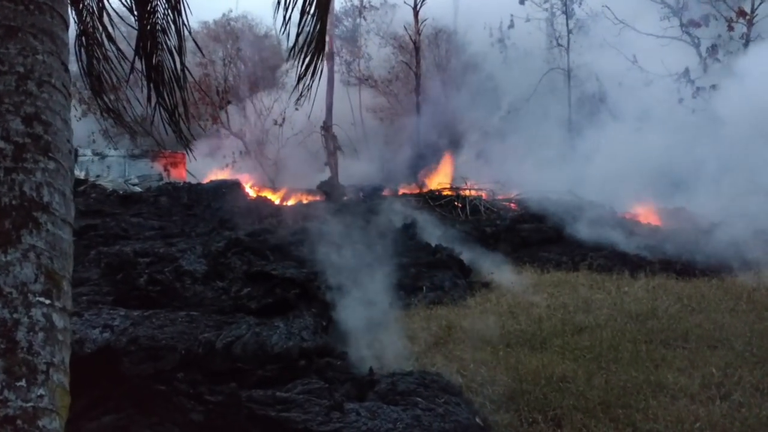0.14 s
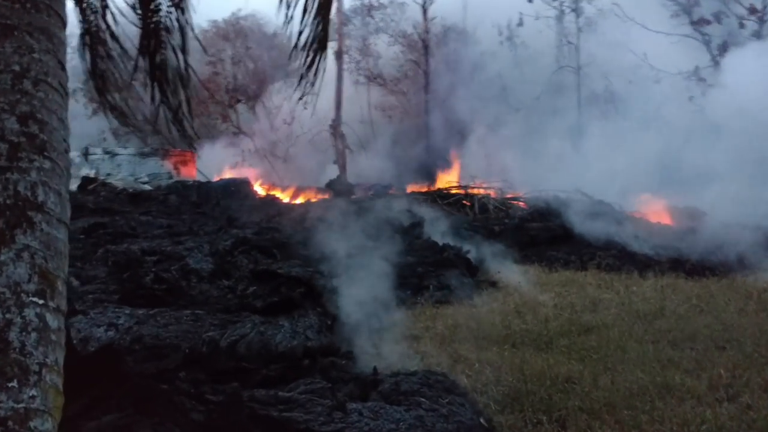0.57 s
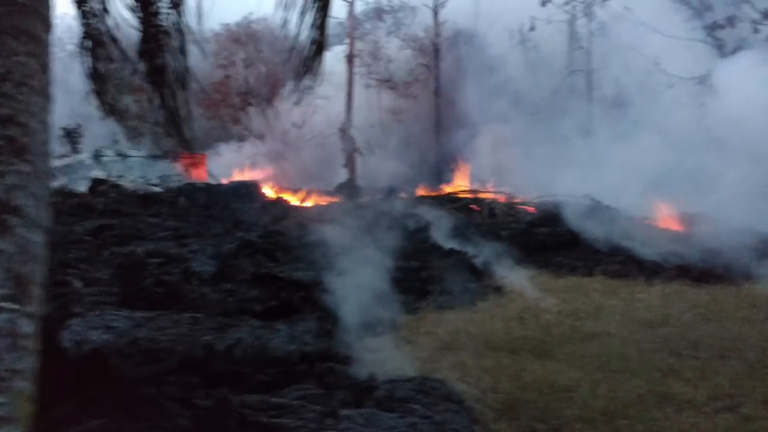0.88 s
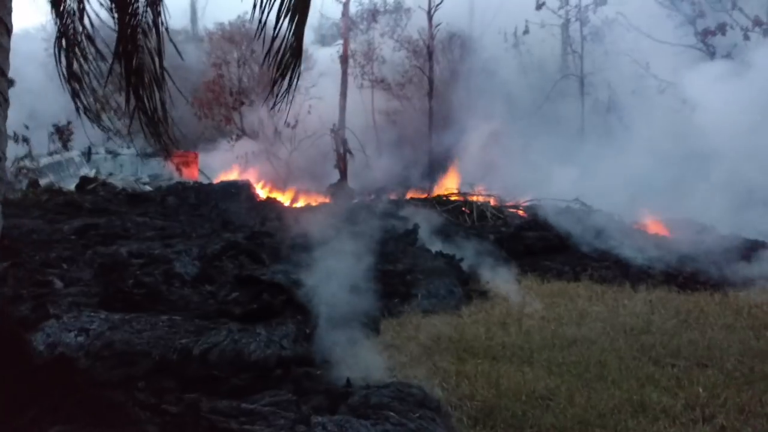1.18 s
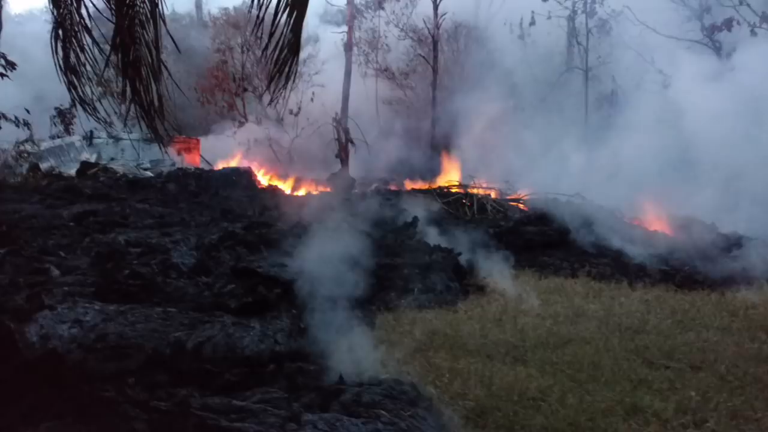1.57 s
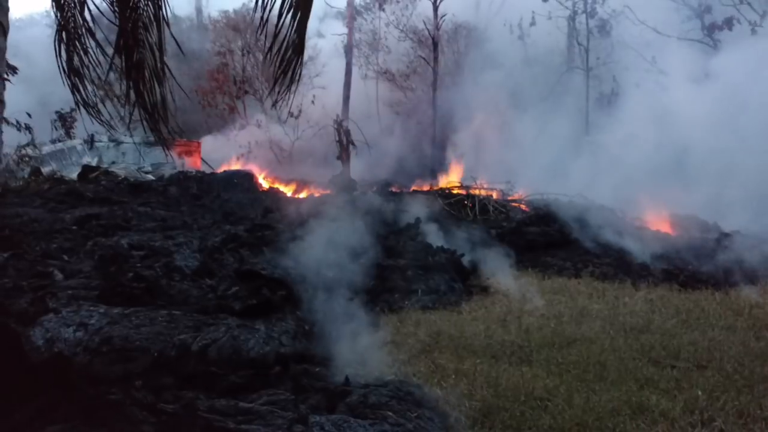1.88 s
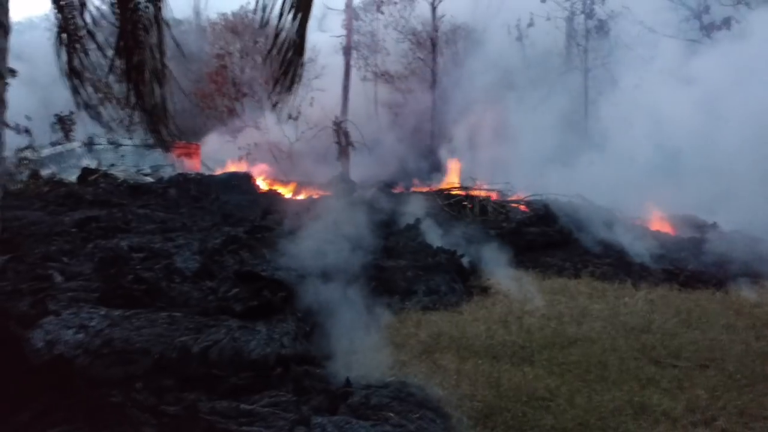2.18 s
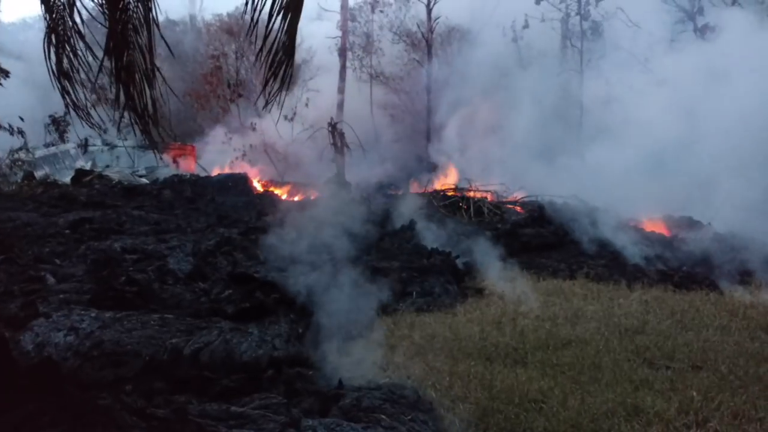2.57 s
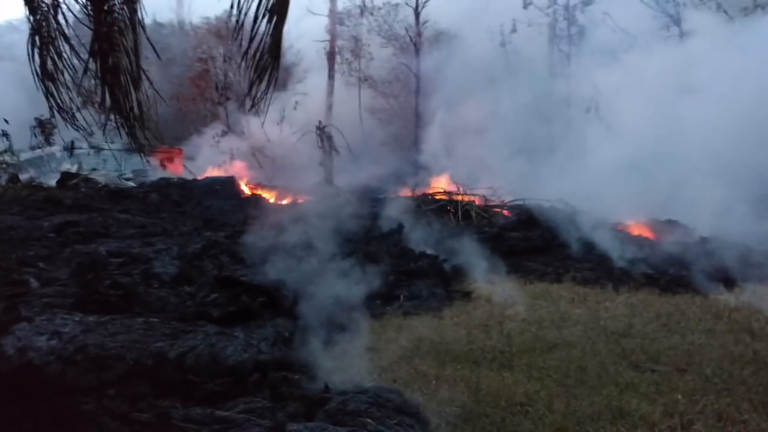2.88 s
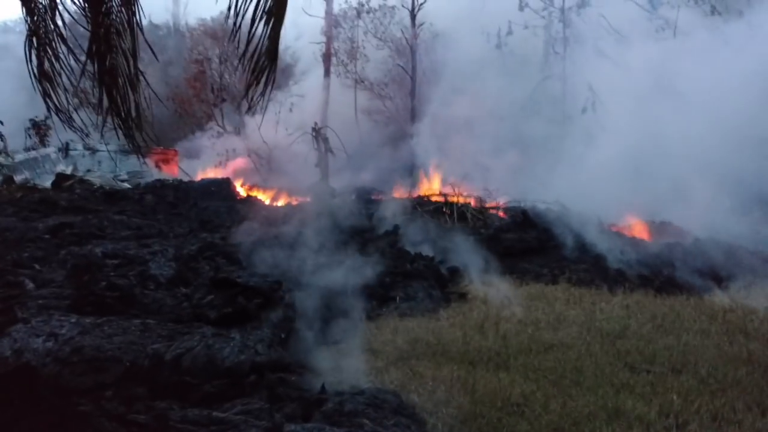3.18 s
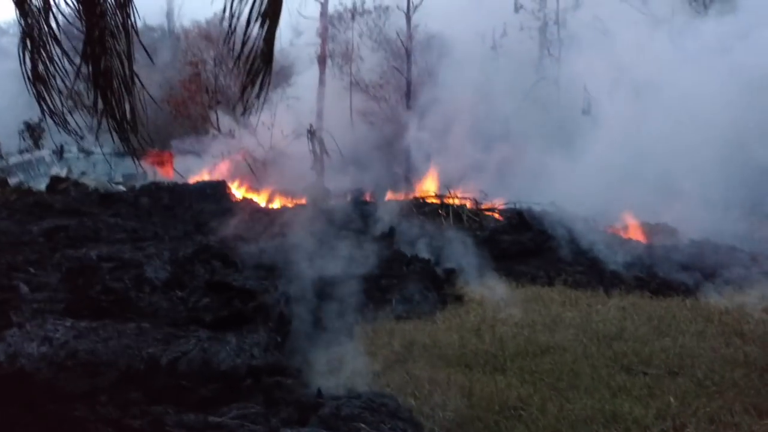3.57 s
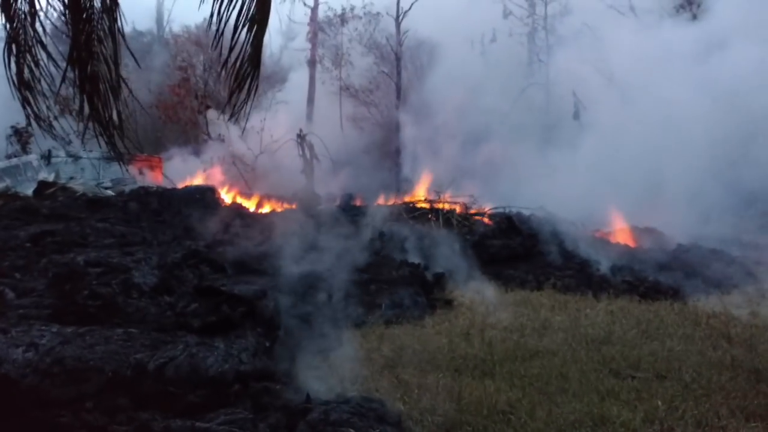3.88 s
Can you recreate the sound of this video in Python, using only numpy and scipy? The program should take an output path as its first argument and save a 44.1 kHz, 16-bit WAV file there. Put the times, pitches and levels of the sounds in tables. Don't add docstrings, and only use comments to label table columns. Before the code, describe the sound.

A deep, hissing volcanic gas jet swells, sinks into a crackling lull with thin birdsong, and returns as a strong rush outdoors.

```python
import sys
import numpy as np
from scipy import signal
from scipy.fft import rfft, irfft, next_fast_len
from scipy.io import wavfile

SR = 44100
rng = np.random.default_rng(int(sys.argv[2]) if len(sys.argv) > 2 else 0)


def bounce(signal):
    frames = np.transpose(np.atleast_2d(signal))
    limited = np.clip(frames, -1, 1)
    pcm = np.round(limited * 32767).astype(np.int16)
    wavfile.write(sys.argv[1], SR, pcm)


def gain_from_db(level_db):
    decades = np.asarray(level_db, float) / 20
    return 10 ** decades


N = 178428

ROAR_LAG_S = 0.000005


def at_hz(points, hz):
    f_hz, values = np.array(points)[:, 0], np.array(points)[:, 1]
    return np.interp(np.log(hz), np.log(f_hz), values)


def in_time(rows):
    return np.interp(np.arange(N) / SR, *np.transpose(rows))


def drift(rate_hz):
    stride = 16
    r = np.exp(-2 * np.pi * stride * rate_hz / SR)
    noise = rng.standard_normal(N // stride + 3002)
    slow = signal.lfilter([1], [1, -2 * r, r * r], noise)[3000:]
    return np.interp(np.arange(N) / stride, np.arange(len(slow)), slow / slow.std())


def delayed(x, lag_s):
    size = next_fast_len(N + 256)
    phase = np.exp(-2j * np.pi * lag_s * np.fft.rfftfreq(size, 1 / SR))
    return irfft(rfft(x, size) * phase, size)[..., :N]


def band_pass(x, low_hz, high_hz):
    return signal.sosfilt(signal.butter(2, [low_hz, high_hz], "band", fs=SR, output="sos"), x)


def region_levels():
    # t/s, level/dB
    pressure = [(0, -9), (.2, -6.5), (.45, -3.5), (.62, -8.5), (.85, -13), (1.05, -5), (1.2, -0.5),
                (1.5, 2), (1.62, -1.5), (1.76, -1), (1.95, -16), (2.28, -14.5), (2.56, -19.5),
                (2.82, -32.5), (3.12, -18), (3.45, 1), (3.85, 2), (4.05, -4)]
    # t/s, level/dB
    burn = [(0, -4), (.2, -2.5), (.42, 0.5), (.8, -6.5), (1.2, -4), (1.6, -6), (2.0, -6.5), (2.35, -3.5),
            (2.6, -8.5), (2.84, -9), (2.95, -3.5), (3.1, -4.5), (3.35, 4.5), (3.6, -2), (3.85, -1),
            (4.05, -6)]
    # t/s, level/dB
    nozzle = [(0, 6), (.45, 0), (.7, 7), (1.05, 10.5), (1.3, 1.5), (1.55, 3.5), (1.9, -1), (2.3, 1.5),
              (2.75, -7.5), (3.2, -3), (3.5, -3), (4.05, -6.5)]
    full_db = [-26.5, -25, -30.5, -37.5]
    follows_pressure = [0.077, 0.58, 0.89, 0.98]
    follows_burn = [0.92, 0.13, 0.0092, 0.011]
    follows_nozzle = [0.3, -0.22, 0.26, 0.46]
    push_share = [.4, 1.0, .0, .4]
    spit_share = [.0, .0, .8, .95]
    # t/s, length/s, push/dB, spit/dB
    sputters = [(0.422, 0.035, 1.5, 4.5), (0.749, 0.06, 3, 4), (2.257, 0.0044, 0, 12.5),
                (2.281, 0.0052, 2, 9), (2.295, 0.0065, -1, 9), (2.306, .016, -0.5, 4),
                (2.323, 0.028, 8, 0.5), (2.57, 0.027, 6, 3.5), (2.644, .054, 10.5, 14), (2.765, .004, 5, 5),
                (2.82, .03, 6, 0), (2.93, .016, 5, 0), (2.975, 0.014, 1, -8), (3.094, 0.011, 8, -27)]
    open_s, close_s = 0.0013, 0.0036

    t = np.arange(N) / SR
    levels = np.array(full_db)[:, None] + np.outer(follows_pressure, in_time(pressure))
    levels += np.outer(follows_burn, in_time(burn))
    levels += np.outer(follows_nozzle, in_time(nozzle))
    for start, length, push_db, spit_db in sputters:
        shape = np.interp(t - start, [-open_s, 0, length, length + close_s], [0, 1, 1, 0])
        gain_db = push_db * np.array(push_share) + spit_db * np.array(spit_share)
        levels += np.outer(gain_db, shape)
    return levels


def jet(flutter_db, surge_db, patchy_db, crackle_db):
    region_hz = [170, 900, 3500, 10000]
    # f/Hz, level/dB
    jet_colour = [(28, -3), (60, 19), (110, 27.5), (180, 28.5), (340, 15), (500, 12.5), (700, 14),
                  (1030, 9), (1400, 9.5), (2200, 12), (3500, 13), (6500, 8), (11000, 6), (15500, -2)]
    # f/Hz, share/0-1
    direct_share = [(60, 1), (200, 0.99), (400, 0.92), (800, 0.85), (1300, 1), (1900, 0.8), (2700, 0.8),
                    (4000, 0.8), (7000, 0.3), (14000, 0.2)]
    roar_top_hz, hiss_foot_hz, vent_lag_s = 735, 1260, 0.0001

    third_octaves = 25 * 2 ** np.arange(0, 9.8, 1 / 3)
    noises = []
    for straight in rng.standard_normal((2, N)):
        scattered = rng.standard_normal((2, N))
        noises.append([straight, delayed(straight, ROAR_LAG_S), delayed(straight, vent_lag_s), scattered])
    flutter, crackle = drift(10.3), drift(390.0)
    surges = np.array([drift(37.0) for _ in region_hz])
    moving_db = region_levels() + surge_db * surges
    out = np.zeros((2, N))
    for k, (low, high) in enumerate(zip(third_octaves, third_octaves[1:])):
        hz = np.sqrt(low * high)
        left, ahead, aside, scattered = noises[k % 2]
        vent = np.interp(hz, [roar_top_hz, hiss_foot_hz], [0, 1])
        direct = np.array([left, ahead + vent * (aside - ahead)])
        share = np.clip(at_hz(direct_share, hz), 0, 1)
        pair = np.sqrt(share) * direct + np.sqrt(1 - share) * scattered
        weights = np.array([np.interp(np.log(hz), np.log(region_hz), row) for row in np.eye(len(region_hz))])
        level_db = at_hz(jet_colour, hz) + weights @ moving_db
        level_db = level_db + flutter_db * flutter + patchy_db * drift(10.9)
        level_db = level_db + crackle_db * weights[-1] * crackle
        out += gain_from_db(level_db) * band_pass(pair, low, high)
    return out


def howls():
    # t/s, length/s, from f/Hz, to f/Hz, level/dB
    howl_table = [
        (0.55, 0.072, 700, 700, -36),
        (1, 0.085, 720, 620, -28),
        (1.29, 0.09, 750, 580, -33.5),
        (1.38, 0.1, 780, 580, -28),
        (1.34, 0.084, 1250, 1350, -33),
        (1.55, 0.033, 620, 630, -32),
        (1.69, 0.059, 1300, 1400, -38),
        (3.687, 0.15, 700, 860, -37),
        (3.6, 0.35, 1300, 1350, -40.5),
    ]
    width_hz, steady = 66, 1.0

    t, out = np.arange(N) / SR, 0
    beat = steady + drift(width_hz) + 1j * drift(width_hz)
    for start, length, from_hz, to_hz, level_db in howl_table:
        done = np.clip((t - start) / length, 0, 1)
        pitch_hz = from_hz + (to_hz - from_hz) * done
        tone = beat * np.exp(2j * np.pi * np.cumsum(pitch_hz) / SR)
        out = out + gain_from_db(level_db) * np.sin(np.pi * done) * tone.real
    return out


def pops():
    # t/s, ring f/Hz, peak level/dB, time to decay by 60 dB/s
    bursts = [(.73, 700, -25, .01), (.783, 800, -23, .008), (.941, 690, -25, .008), (2.313, 500, -22, .006),
              (2.321, 600, -20, .008), (2.333, 330, -20, .02), (2.339, 500, -19, .016),
              (2.347, 600, -23, .01), (2.395, 670, -26, .012), (2.483, 800, -26, .01),
              (2.574, 600, -25, .005), (2.586, 1000, -20, .006), (2.562, 1300, -27, .005),
              (2.621, 1200, -28, .006), (2.652, 850, -23, .008), (2.659, 750, -18, .006),
              (2.667, 900, -18, .006), (2.678, 900, -23, .006), (2.684, 450, -22, .008),
              (2.69, 800, -20, .008), (2.795, 900, -30, .008), (2.826, 750, -30, .01),
              (2.843, 700, -31, .008), (2.874, 900, -28, .006), (2.935, 790, -30, .008),
              (2.971, 900, -24, .007), (3.098, 720, -22, .01), (3.102, 900, -21, .008),
              (3.168, 700, -23, .01), (3.178, 500, -21, .012)]
    t, out = np.arange(int(0.05 * SR)) / SR, np.zeros(N)
    for start, hz, peak_db, t60 in bursts:
        ring = gain_from_db(peak_db - 60 * t / t60) * np.sin(2 * np.pi * hz * t)
        out[int(start * SR):][:len(t)] += ring
    return np.array([out, delayed(out, ROAR_LAG_S)])


def ticks():
    # t/s, peak level/dB, foot f/Hz
    tick_table = [
        (2.262, -25, 2500),
        (2.2965, -22, 3000),
        (2.645, -21, 3000),
        (2.668, -22, 3000),
        (2.752, -29, 9000),
        (2.765, -24, 9000),
    ]
    out = 0
    for start, peak_db, foot_hz in tick_table:
        click = gain_from_db(peak_db) * (np.arange(N) == int(start * SR)) + 1e-18
        out = out + signal.sosfilt(signal.butter(2, foot_hz, "high", fs=SR, output="sos"), click)
    return out * np.array([[1], [0.3]])


def whistle(turns, buzz, fade_s):
    t, (times, hz) = np.arange(N) / SR, np.transpose(turns)
    place = np.interp(t, times, np.arange(len(times)))
    eased = np.floor(place) + (1 - np.cos(np.pi * (place % 1))) / 2
    pitch = np.interp(eased, np.arange(len(times)), hz)
    ends = np.interp(t, [times[0], times[0] + fade_s, times[-1] - fade_s, times[-1]], [0, 1, 1, 0])
    return ends * np.sin(2 * np.pi * np.cumsum(pitch * (1 + buzz)) / SR), pitch


def bird(echo_db):
    # t/s, f/Hz
    slurs = [
        [(2.474, 5200), (2.486, 6450), (2.497, 5900), (2.516, 5950), (2.552, 4720), (2.58, 4580), (2.594, 4350)],
        [(2.728, 5900), (2.744, 7200), (2.768, 7300), (2.789, 5150), (2.817, 6300), (2.846, 4450), (2.86, 4450),
         (2.88, 5070), (2.896, 4250)],
        [(3.045, 5000), (3.062, 5950), (3.085, 5450), (3.102, 4700), (3.112, 5050), (3.13, 4550), (3.168, 4150)],
    ]
    slur_db = [-39, -37, -43.5]
    slur_buzz = [.002, .002, .01]
    # t/s, length/s, from f/Hz, to f/Hz, level/dB
    chips = [(2.04, .04, 4700, 4350, -47), (2.398, .018, 7700, 6900, -56), (2.605, .035, 3750, 3550, -46),
             (2.655, .05, 4700, 4400, -46), (2.735, .035, 6000, 6300, -51), (2.855, .045, 7500, 6300, -47),
             (2.935, .05, 7100, 6450, -46), (2.474, .024, 7300, 6100, -53), (3.028, .045, 7800, 5800, -44),
             (3.055, .05, 5950, 6150, -46), (2.55, .05, 6550, 6600, -53), (2.96, .065, 5600, 5600, -53),
             (3.143, .022, 4500, 4250, -48), (3.178, .028, 7700, 6100, -46)]
    easy_hz, strain_db_per_khz = 4950, 7.5
    slur_fade_s, chip_buzz = 0.012, 0.045
    right_lag_s, bird_db = 0.0003, 3.2

    song, waver, flutter = 0, gain_from_db(bird_db + 1.2 * drift(90.0)), drift(250.0)
    for turns, level_db, buzz in zip(slurs, slur_db, slur_buzz):
        tone, pitch = whistle(turns, buzz * flutter, slur_fade_s)
        strain_db = strain_db_per_khz * np.abs(pitch - easy_hz) / 1000
        song = song + gain_from_db(level_db - strain_db) * tone
    for start, length, from_hz, to_hz, level_db in chips:
        glide = [(start, from_hz), (start + length, to_hz)]
        song = song + gain_from_db(level_db) * whistle(glide, chip_buzz * flutter, length / 2)[0]
    song = song * waver
    near = np.array([gain_from_db(-0.5) * song, delayed(song, right_lag_s)])
    echoes = np.array([delayed(song, 0.011), delayed(song, 0.017)])
    return near + gain_from_db(echo_db) * echoes


def woods(patchy_db):
    # f/Hz, level/dB
    woods_colour = [(3000, -51), (3800, -61), (5000, -48.5), (6500, -60), (7800, -56)]
    strips, out = np.geomspace(3000, 7800, 10), 0
    for low, high in zip(strips, strips[1:]):
        strip = band_pass(rng.standard_normal((2, N)), low, high)
        level_db = at_hz(woods_colour, np.sqrt(low * high)) + patchy_db * drift(10.0)
        out = out + gain_from_db(level_db) * strip / strip.std()
    return out


def hiss(level_db, foot_hz):
    high_pass = signal.butter(4, foot_hz, "high", fs=SR, output="sos")
    return gain_from_db(level_db) * signal.sosfilt(high_pass, rng.standard_normal((2, N)))


def leaves():
    return hiss(level_db=-57, foot_hz=8500)


def scene():
    gas = jet(flutter_db=0.5, surge_db=-0.84, patchy_db=1.46, crackle_db=0.5)
    gas = gas + howls() + pops()
    return gas + ticks() + bird(echo_db=-12) + woods(patchy_db=1.8) + leaves()


def cross_fed(x, angle):
    notch_hz, turn_foot_hz, turn_top_hz = 2592, 1400, 3900
    copy = delayed(x, 1 / notch_hz)
    middle_band = signal.butter(2, [turn_foot_hz, turn_top_hz], "band", fs=SR, output="sos")
    middle = signal.sosfiltfilt(middle_band, copy)
    turned = signal.hilbert(middle, next_fast_len(N))[:N] * np.exp(-1j * angle)
    return copy - middle + turned.real


def hollowed(x, hz, width_hz, depth):
    depth = np.clip(depth, 0, 1)
    return x - depth * signal.lfilter(*signal.iirpeak(hz, hz / width_hz, fs=SR), x)


def top_cut(x):
    return signal.sosfilt(signal.butter(12, 15950, fs=SR, output="sos"), x)


def record(dry):
    # t/s, extra phase lag/rad, leak of difference into sum/0-1
    port_swing = [(0, .0, .07), (.3, .05, .05), (.6, .3, .01), (.85, .22, .02), (1.2, .27, .015),
                  (1.5, .2, 0), (1.8, .05, .01), (2.1, .17, .07), (2.3, .43, .08), (2.65, .45, .07),
                  (3.05, .2, .14), (3.3, .12, .09), (3.6, .33, .05), (4.05, .2, .06)]
    # f/Hz, width/Hz, share/0-1, share lost per leak, wander/share
    sum_hollows = [(2600, 850, 1.0, 9, .1), (5250, 950, .75, 10, .35), (7900, 600, .3, 0, .35),
                   (10450, 1000, -.05, -9, .25), (13100, 800, .35, -2, .3)]
    # f/Hz, width/Hz, share/0-1, wander/share
    apart_hollows = [(1170, 280, .9, .25), (3750, 1000, .5, .2), (6500, 500, .25, .2), (11650, 500, .4, .3),
                     (14250, 800, .68, .2)]
    right_port_db, right_bass_share, right_bass_hz = 0.17, 0.16, 65
    sum_feed, difference_feed = 0.84, 0.3
    feed_top_hz, feed_slack = 8500, 0.3
    turn_wander, leak_rate_hz, hollow_rate_hz = 0.04, 6, 6.0
    sum_cutoff_hz, cutoff_hz = 15140, 15480

    left, right, swing = dry[0], gain_from_db(right_port_db) * dry[1], np.array(port_swing)
    deep_bass = signal.butter(2, right_bass_hz, fs=SR, output="sos")
    right = right + right_bass_share * signal.sosfiltfilt(deep_bass, right)
    both, apart = left + right, left - right

    angle = in_time(swing[:, :2]) + turn_wander * drift(1.0)
    full = cross_fed(both, angle)
    dulled = signal.sosfiltfilt(signal.butter(1, feed_top_hz, fs=SR, output="sos"), full)
    slack = np.clip(0.5 + feed_slack * drift(5.2), 0, 1)
    both = both - sum_feed * (full + slack * (dulled - full))
    apart = apart - -difference_feed * cross_fed(apart, angle)

    leak = in_time(swing[:, ::2])
    both = both + leak * drift(leak_rate_hz) * apart
    for hz, width_hz, share, per_leak, waver in sum_hollows:
        depth = share - per_leak * leak + waver * drift(hollow_rate_hz)
        both = hollowed(both, hz, width_hz, depth)
    for hz, width_hz, share, waver in apart_hollows:
        apart = hollowed(apart, hz, width_hz, share + waver * drift(hollow_rate_hz))

    both, apart = np.array([both, apart]) + hiss(level_db=-67, foot_hz=1500)
    both = signal.sosfiltfilt(signal.butter(16, sum_cutoff_hz, fs=SR, output="sos"), both)
    stereo = 0.65 * np.tanh(np.array([both + apart, both - apart]) / 1.3)
    stereo = signal.sosfilt(signal.ellip(10, 1, 60, cutoff_hz, fs=SR, output="sos"), stereo)
    return top_cut(stereo)


dry = scene()
out = record(dry)
bounce(out)
```